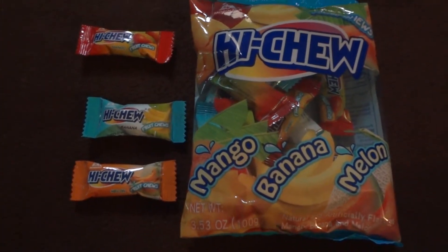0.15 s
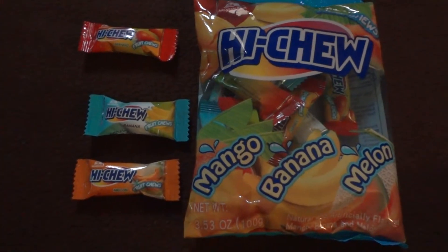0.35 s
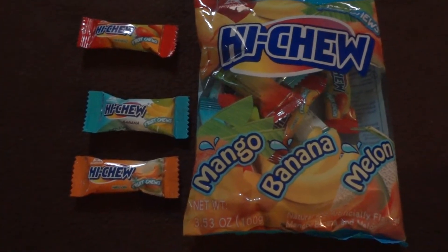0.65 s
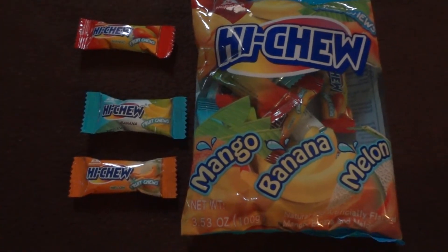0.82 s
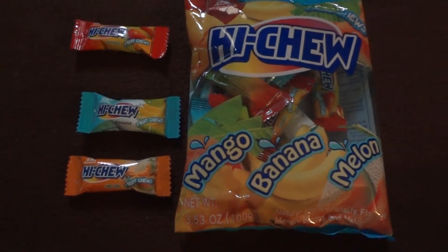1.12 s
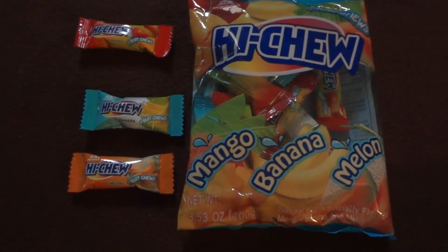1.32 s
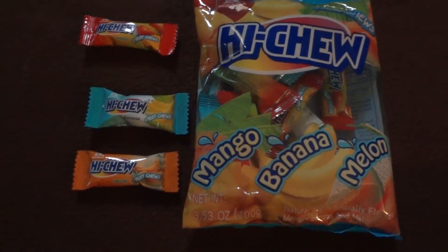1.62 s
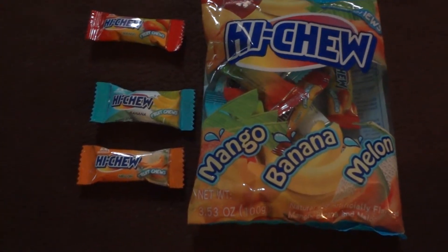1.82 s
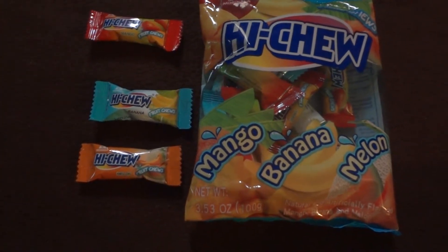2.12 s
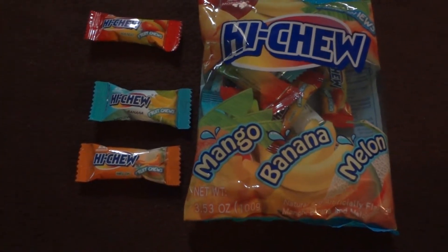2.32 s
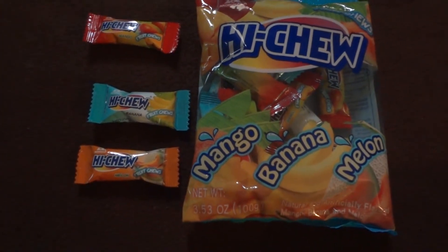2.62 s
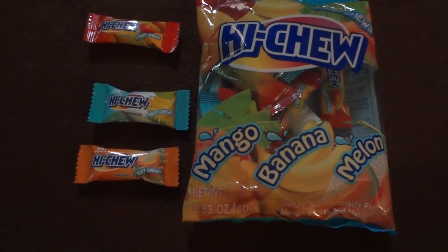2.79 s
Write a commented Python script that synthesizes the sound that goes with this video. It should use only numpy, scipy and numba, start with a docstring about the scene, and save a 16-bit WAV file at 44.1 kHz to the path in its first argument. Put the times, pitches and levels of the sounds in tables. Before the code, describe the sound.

A small plastic candy wrapper is worked open by hand close to the microphone: irregular sharp snaps, brief crumpling rustles and faint film ticks throughout, in a small quiet room with a very low hush.

```python
"""A small plastic candy wrapper is worked open by hand, close to the microphone in a quiet room.
Creases buckle with single snaps: a click, a falling shiver and a facet ringing for about a millisecond;
one low fingertip knock is made the same way. Finger movements make the film slide and crumple in swarms
of tiny noise ticks that ring its tautness; the held film slides and ticks faintly throughout. A nearby
surface and the room answer with decaying noise reflections, over a low hush of coloured noise and hum."""
import sys
import numpy as np
from scipy import signal
from scipy.fft import rfft, irfft
from scipy.io import wavfile
from numba import njit

SR = 44100
rng = np.random.default_rng(int(sys.argv[2]) if len(sys.argv) > 2 else 0)


def store_wav(level_fs):
    """Save 16-bit WAV to argv[1]."""
    pcm = np.round(np.clip(np.atleast_2d(level_fs), -1, 1) * 32767)
    wavfile.write(sys.argv[1], SR, pcm.T.astype(np.int16))


N = 130095  # length [samples]

# Room hush, common to both ears: (frequency [Hz], gain [dB])
HUSH_COLOUR = [(15, -50), (25, 0), (400, -3.5), (1400, -12), (15000, -36.5)]
# Room hush, differing between the ears: (frequency [Hz], gain [dB])
HUSH_SIDE_COLOUR = [(30, -24), (190, -5), (600, -2), (15000, -26.5)]
# Faint sliding and ticking of the held film: (time [s], level [dB])
HOLD_LEVELS = [(.07, -56), (.15, -59.5), (.26, -42.5), (.43, -57), (.69, -50.5), (.75, -53.5), (0.898, -48),
               (1.02, -58), (1.15, -38.5), (1.38, -55), (1.76, -51), (2.24, -48.5), (2.66, -51),
               (2.73, -63.5), (2.85, -55)]
# Colour of the film: (frequency [Hz], gain [dB])
FILM_COLOUR = [(300, -15.5), (1500, -8.5), (2300, 2), (13000, 2.5), (16000, -4.5)]
# One finger movement per row: (start [s], length [s], level at full push [dB],
# treble tilt [dB per octave], resonance of the taut film [Hz], gain of that resonance [ratio])
RUBS = [(0.28, 0.019, -29, 2, 9350, 1.2), (0.466, 0.018, -37.5, -1, 4300, .6),
        (0.58, 0.033, -31, -0.5, 3350, 1.5), (0.824, 0.042, -43, -1.5, 2300, 0.8),
        (1.058, 0.095, -42, 4, 4430, 0.59), (1.256, 0.083, -41.5, -6.5, 6540, 2.9),
        (1.557, 0.061, -38, 4, 2180, 1.8), (1.973, 0.075, -35, 3.5, 6400, 0.24),
        (2.113, 0.077, -37.5, 12, 7800, 1.4), (2.432, 0.034, -29.5, 11, 3080, 3.2),
        (2.48, 0.1, -52, 9.5, 3020, 18), (2.573, 0.082, -44.5, 5, 3060, 15),
        (2.825, 0.115, -51, -4, 6230, 1.4)]
# One snap per row, with one low fingertip knock at 0.5895 s; levels over 1 ms before the room:
# (time [s], ring pitch [Hz], body level [dB], middle level [dB], treble level [dB])
SNAPS = [(0.0252, 8800, -42, -46.5, -35.5), (0.0834, 6330, -44.5, -37, -41),
         (0.2056, 5630, -36, -23.5, -27.5), (0.2636, 7200, -36.5, -29.5, -32),
         (0.2865, 9270, -27.5, -27, -17), (0.325, 1904, -22, -21.5, -30), (0.4684, 5800, -47, -29.5, -34.5),
         (0.5883, 9300, -41, -27, -16.5), (0.5895, 1010, -36.5, -51, -52), (0.607, 8560, -37, -23.5, -21),
         (0.649, 2360, -31.5, -31.5, -29.5), (0.6666, 11100, -42, -44, -37), (0.71, 5430, -40.5, -41, -47),
         (0.8622, 9440, -45, -37.5, -30.5), (0.926, 11450, -36.5, -32.5, -27),
         (0.9651, 2300, -35.5, -46, -54), (0.9736, 7300, -39.5, -35, -38), (1.0742, 4460, -33, -15.5, -33),
         (1.118, 4640, -39, -22.5, -28.5), (1.1428, 5900, -34, -19, -36), (1.1495, 4760, -28.5, -21, -25),
         (1.1714, 5460, -35, -19, -24), (1.368, 3720, -41.5, -34, -68), (1.4102, 5460, -36.5, -28, -40),
         (1.427, 6840, -42, -36, -40), (1.4525, 7130, -38.5, -26, -33), (1.5529, 7030, -30.5, -18.5, -28),
         (1.5702, 2210, -27, -24, -23), (1.604, 10400, -37.5, -26, -22.5), (1.7206, 8860, -39, -34, -29.5),
         (1.8299, 6490, -36, -21, -22.5), (1.849, 6170, -53, -28.5, -32), (1.8724, 8000, -47, -23, -27),
         (1.8809, 6900, -25, -15, -18), (1.969, 10300, -37, -25.5, -22.5), (1.9983, 6230, -32, -19, -18.5),
         (2.0449, 4840, -36, -25, -39), (2.0561, 5200, -35, -31, -31.5), (2.101, 2550, -27.5, -25, -27.5),
         (2.1153, 3790, -42, -25, -36), (2.139, 2610, -25.5, -26.5, -49),
         (2.1755, 13100, -33, -28.5, -22.5), (2.2535, 6240, -39, -34.5, -37),
         (2.3085, 2470, -39.5, -35, -64), (2.3299, 10050, -39.5, -34, -15.5),
         (2.3384, 11900, -35.5, -22, -18.5), (2.428, 7870, -33.5, -17.5, -19.5),
         (2.4512, 10140, -36, -30, -19), (2.4967, 6100, -36.5, -27.5, -29.5),
         (2.583, 13500, -40.5, -25.5, -27.5), (2.6249, 3300, -31.5, -26, -47),
         (2.6405, 9820, -56, -28, -21.5), (2.8331, 2420, -38.5, -34.5, -58),
         (2.9016, 6340, -44, -34.5, -59)]
# Edges of the body, middle and treble bands: (frequency [Hz])
SNAP_EDGES_HZ = [1000, 3200, 8000, 16000]

# Background
HUSH_DB, HUSH_SIDE_DB = -61.5, -57
HUM_HZ, HUM_DB = 120, -76
# Reflections: levels relative to the dry wrapper, widths are the share sent to the side
ECHO_S, ECHO_DB, ECHO_SMEAR_S = 0.0061, -20, 0.0022
EARLY_DB, EARLY_T60_S, EARLY_WIDTH = -15.5, 0.077, 0.47
ROOM_DB, ROOM_T60_S, ROOM_WIDTH = -14, 0.24, 0.18
DIRECT_SIDE_DB = -20
# Film and its ticks
FILM_CUT_HZ = 966  # so small a sheet radiates little bass
TOP_HZ = 15500
TILT_FROM_HZ = 4100  # the tilts act above this
TICK_S, TICK_WIDTH_BANDS = 0.0006, 1.7
HOLD_TICKS_PER_S, HOLD_SPREAD_DB = 350, 4
HOLD_SLIDE_DB = 0  # smooth slide, relative to the ticks
# Finger movements
TICKS_PER_S, TICK_SPREAD_DB = 3500, 4.5
RUB_ATTACK_S, RUB_RELEASE_S = 0.0015, 0.0093
CATCH_S, CATCH_DB = 0.005, 1.5  # the fingers catch and slip
TAUT_Q = 11
TAUT_RISE_OCT_PER_S = 0.73  # the resonance climbs as the film is pulled tight
SLIDE_SHARE = 0.43  # the tauter the film, the more smooth slide joins the ticks
# Snaps: shares are mixed before the bands are levelled
RING_S, RING_SHARE = 0.00079, 0.32
FLUTTER_S, FLUTTER_SHARE = 0.00048, 0.57  # the film shivers just after it buckles
BEND_S = 0.000991  # bending waves disperse: the highs arrive first
LEAD_IN_S, LEAD_IN_DB = 0.0016, -25  # a faint noise swell just before each crack, relative to the flutter
CUT_RISE_HZ_PER_DB = 43  # the thinner the snap, the higher its bass cut
CEILING = 0.5  # full scale is 1


def undb(db):
    """Decibels to gain."""
    return 10 ** (np.asarray(db) / 20)


def level(x, db):
    """Set the rms level."""
    return x * undb(db) / np.sqrt(np.mean(x ** 2))


def colour(x, points, tilt_db=0):
    """Shape a spectrum by (Hz, dB) points and a treble tilt per octave."""
    f = np.maximum(np.arange(len(x) // 2 + 1) * SR / len(x), 1)
    hz, db = np.array(points).T
    curve_db = np.interp(np.log(f), np.log(hz), db)
    octaves_up = np.log2(np.maximum(f / TILT_FROM_HZ, 1))
    return irfft(rfft(x) * undb(curve_db + tilt_db * octaves_up), len(x))


def stereo(mid, side):
    """Left and right from mid and side."""
    return np.array([mid + side, mid - side])


@njit
def resonate(x, hz, q):
    """Band-pass with a moving centre, gain 1 there."""
    y, band, low = np.empty(len(x)), 0., 0.
    for i in range(len(x)):
        g = np.tan(np.pi * hz[i] / SR)
        v = (band + g * (x[i] - low)) / (1 + g * (g + 1 / q))
        band = 2 * v - band
        low = low + 2 * g * v
        y[i] = v / q
    return y


def hush():
    """Steady room noise, coloured apart for mid and side, with a faint mains hum."""
    mid = level(colour(rng.standard_normal(N), HUSH_COLOUR), HUSH_DB)
    side = level(colour(rng.standard_normal(N), HUSH_SIDE_COLOUR), HUSH_SIDE_DB)
    hum = level(np.sin(2 * np.pi * HUM_HZ * np.arange(N) / SR), HUM_DB)
    return stereo(mid + hum, side)


def scatter(x, delay_s, t60_s, db):
    """A delayed spray of noise reflections that dies away by 60 dB in t60_s."""
    t = np.arange(SR // 2) / SR - delay_s
    decay = (t >= 0) * np.exp(-np.log(1000) * np.maximum(t, 0) / t60_s)
    spray = rng.standard_normal(len(t)) * decay
    return signal.fftconvolve(x, spray * undb(db) / np.linalg.norm(spray))[:N]


def room(x):
    """The direct sound, one near reflection, early scatter and a longer tail, with noise for width."""
    mid = x + scatter(x, ECHO_S, ECHO_SMEAR_S, ECHO_DB)
    side = scatter(x, ECHO_SMEAR_S / 2, ECHO_SMEAR_S, DIRECT_SIDE_DB)
    early = EARLY_T60_S, EARLY_DB, EARLY_WIDTH
    tail = ROOM_T60_S, ROOM_DB, ROOM_WIDTH
    for t60_s, db, width in (early, tail):
        mid = mid + scatter(x, ECHO_S, t60_s, db)
        side = side + width * scatter(x, ECHO_S, t60_s, db)
    return stereo(mid, side)


def ticks(per_s, spread_db, bands=8):
    """Random tiny creases, many weak and a few strong, each a short noise shiver around its own pitch."""
    chance, size = rng.random(N), rng.exponential(size=N)
    pitch = rng.uniform(-1.16, bands, N)  # in band numbers
    clicks = (chance < per_s / SR) * undb(spread_db * np.minimum(size, 4))
    centres = np.geomspace(FILM_CUT_HZ, TOP_HZ, bands)
    f = np.arange(N // 2 + 1) * SR / N
    decay = np.exp(-2 / (TICK_S * SR))  # of power, per sample
    spec = 0
    for k, band in enumerate(np.eye(bands)):
        share = np.exp(-((pitch - k) / TICK_WIDTH_BANDS) ** 2)
        power = signal.lfilter([1], [1, -decay], (clicks * share) ** 2)
        shiver = np.sqrt(power) * rng.standard_normal(N)
        # crossfade into the neighbouring bands
        spec = spec + rfft(shiver) * np.sqrt(np.interp(f, centres, band))
    return irfft(spec, N)


def held_film():
    """The film slides softly under the fingers as smooth noise, with a sparse scatter of small random ticks."""
    ticking = level(ticks(HOLD_TICKS_PER_S, HOLD_SPREAD_DB), 0)
    slide = level(rng.standard_normal(N), HOLD_SLIDE_DB)
    hold_db = np.interp(np.arange(N) / SR, *np.array(HOLD_LEVELS).T)
    return level(colour(ticking + slide, FILM_COLOUR), 0) * undb(hold_db)


def rubs(size=16384, lead=1024):
    """Each finger movement lets loose an uneven swarm of ticks that rings the taut film."""
    # one random grip every CATCH_S
    grip = np.interp(np.arange(N) / SR / CATCH_S, np.arange(N), rng.standard_normal(N))
    swarm = level(ticks(TICKS_PER_S, TICK_SPREAD_DB) * undb(CATCH_DB * grip), 0)
    swarm = np.tile(swarm, 2)  # spare length for the last rub
    out, t = np.zeros(N + size), (np.arange(size) - lead) / SR
    for start, length, db, tilt_db, hz, ring in RUBS:
        i = int(start * SR) - lead
        slide = SLIDE_SHARE * max(ring - 1, 0) * rng.standard_normal(size)
        x = colour(swarm[i:i + size] + slide, FILM_COLOUR, tilt_db)
        taut_hz = hz * 2 ** (TAUT_RISE_OCT_PER_S * np.clip(t, 0, length))
        x = x + ring * resonate(x, taut_hz, float(TAUT_Q))
        attack = np.clip(t / RUB_ATTACK_S + 0.5, 0, 1)
        push = attack * np.exp(-np.maximum(t - length, 0) / RUB_RELEASE_S)
        out[i:i + size] += level(x * push, db) * np.sqrt(np.mean(push ** 2))
    return out[:N]


def snap(hz, band_db, size=1024, lead=512, order=5):
    """One snap: a faint noise lead-in, a crack, a dispersing shiver and a ring, levelled in three bands."""
    t = np.arange(size - lead) / SR
    # the shiver falls in pitch, jittering at every sample
    bend_hz = TOP_HZ / (1 + t / BEND_S) ** 2 * rng.uniform(0, 1.994, len(t))
    bend = np.cumsum(bend_hz) / SR
    flutter = np.sin(2 * np.pi * bend + rng.uniform(0, 2 * np.pi)) * np.exp(-t / FLUTTER_S)
    ring = np.sin(2 * np.pi * hz * t) * np.exp(-t / RING_S)
    crack = 0.5 * (t == 0)
    x = FLUTTER_SHARE * flutter + RING_SHARE * ring + crack

    swell = np.exp(np.arange(-lead, 0) / SR / LEAD_IN_S)
    lead_in = undb(LEAD_IN_DB) * FLUTTER_SHARE * rng.laplace(size=lead) * swell
    cut_hz = FILM_CUT_HZ + CUT_RISE_HZ_PER_DB * (band_db.max() - band_db[0])
    bass_cut = signal.butter(order, cut_hz, "high", fs=SR, output="sos")
    x = signal.sosfilt(bass_cut, np.concatenate([lead_in, x]))

    spec, f = rfft(colour(x, FILM_COLOUR)), np.arange(size // 2 + 1) * SR / size
    edges = np.array(SNAP_EDGES_HZ)
    centres = (edges[1:] + edges[:-1]) / 2
    for _ in range(2):  # the second pass settles the band levels closer
        power = np.array([np.sum(abs(spec[(f >= lo) & (f < hi)]) ** 2)
                          for lo, hi in zip(edges, edges[1:])])
        have_db = 10 * np.log10(power * 2 / size / (SR / 1000))  # energy spread over 1 ms
        spec = spec * undb(np.interp(f, centres, band_db - have_db))
    return irfft(spec), lead


def snaps():
    """All the distinct snaps and the knock, each placed so that its crack falls on its time."""
    out = np.zeros(N + SR)
    for start, hz, *band_db in SNAPS:
        x, lead = snap(hz, np.array(band_db))
        i = int(start * SR) - lead
        out[i:i + len(x)] += x
    return out[:N]


def scene():
    """The wrapper in its room, over the hush."""
    wrapper = snaps() + rubs() + held_film()
    return room(wrapper) + hush()


def record(dry):
    """Round the highest peaks with a soft ceiling and cut the top with a steep low-pass."""
    dry = CEILING * np.tanh(dry / CEILING)
    top_cut = signal.ellip(8, 0.2, 80, TOP_HZ, fs=SR, output="sos")
    return signal.sosfilt(top_cut, dry)


dry = scene()
out = record(dry)
store_wav(out)
```